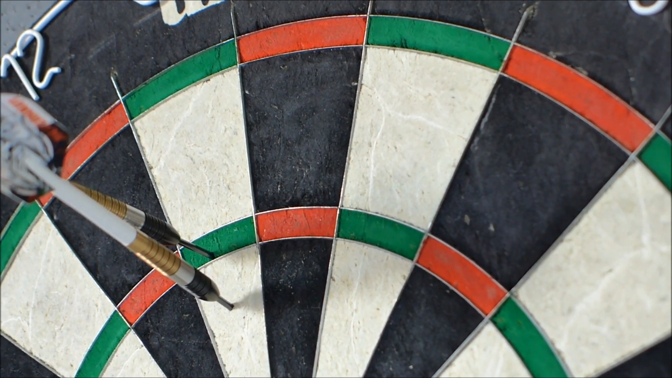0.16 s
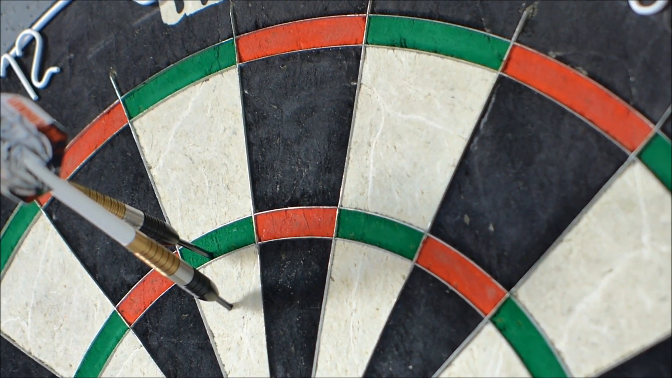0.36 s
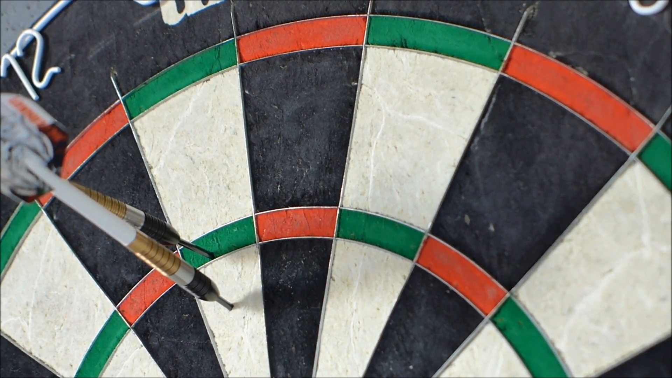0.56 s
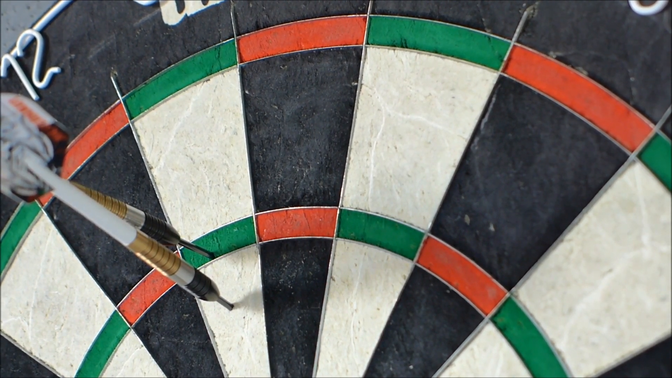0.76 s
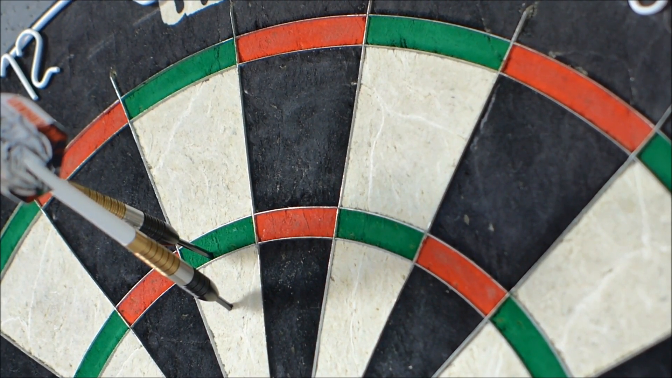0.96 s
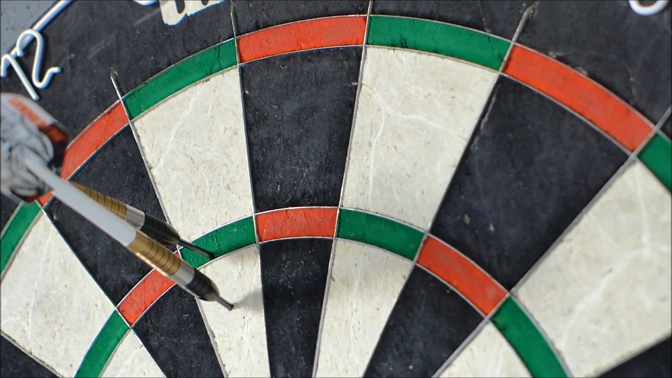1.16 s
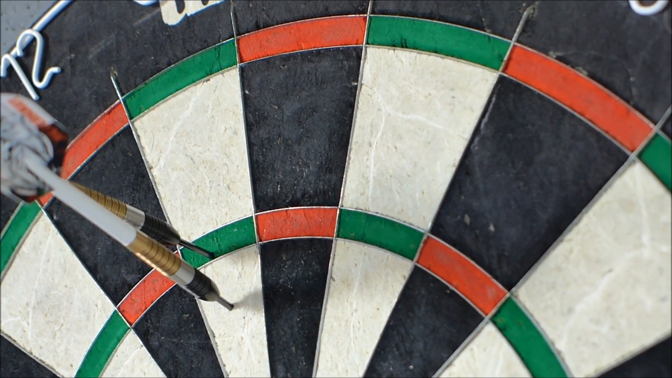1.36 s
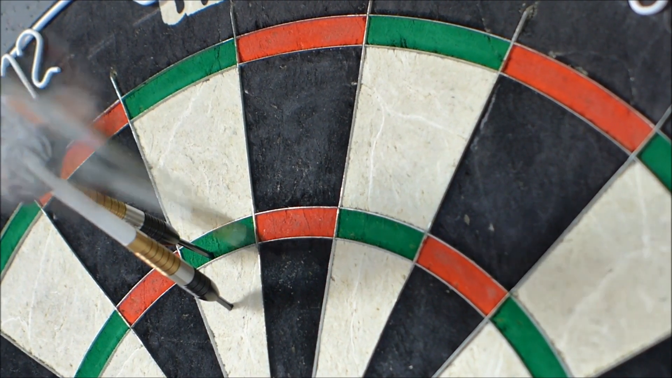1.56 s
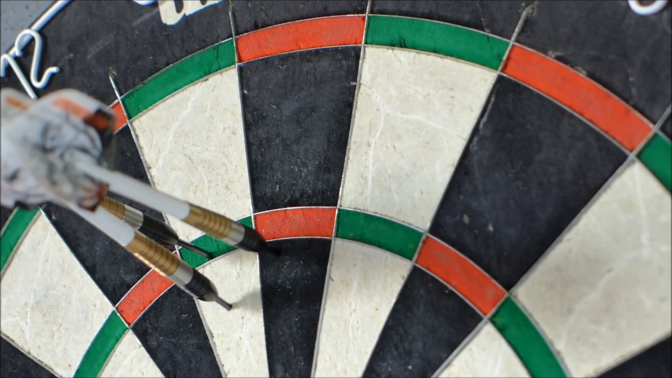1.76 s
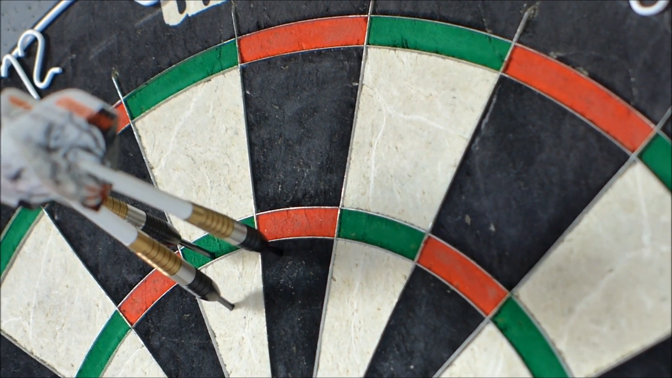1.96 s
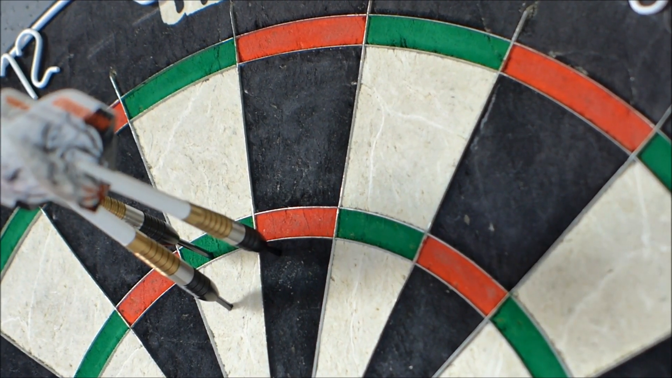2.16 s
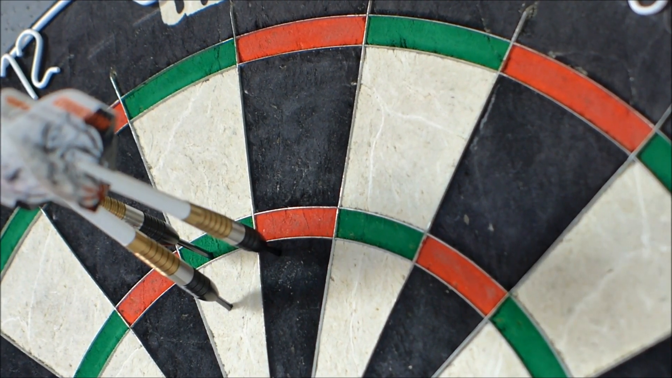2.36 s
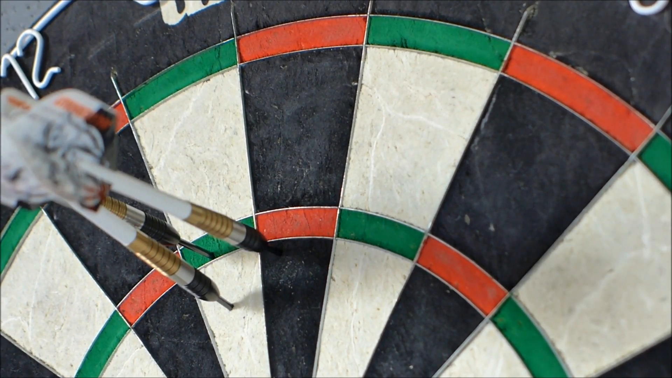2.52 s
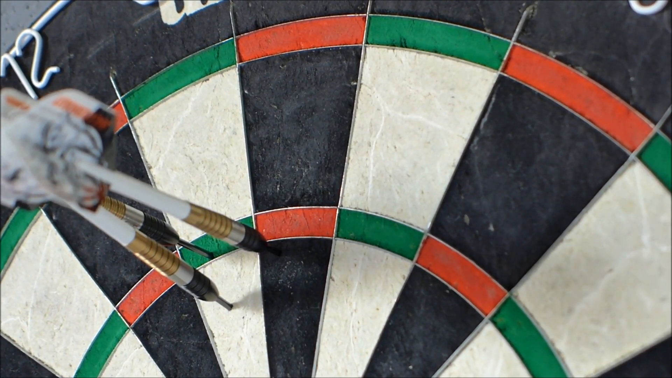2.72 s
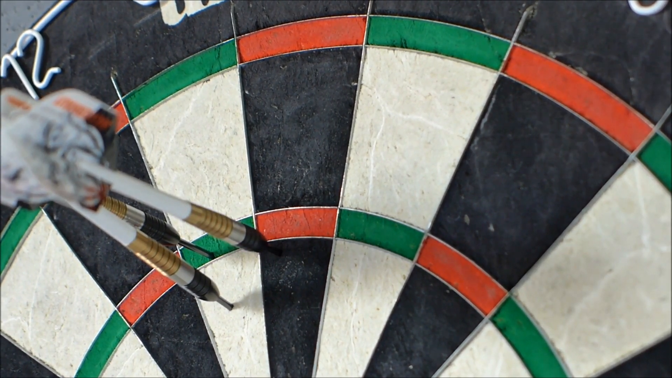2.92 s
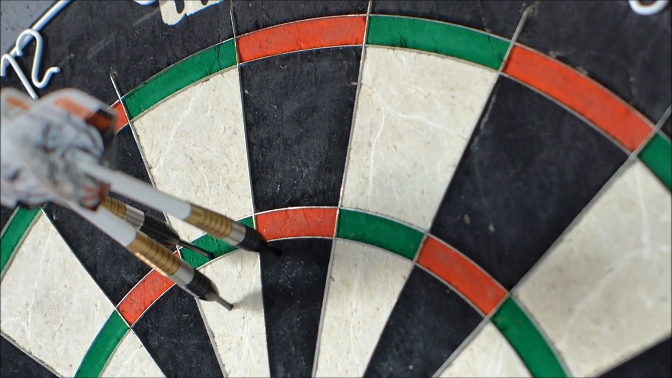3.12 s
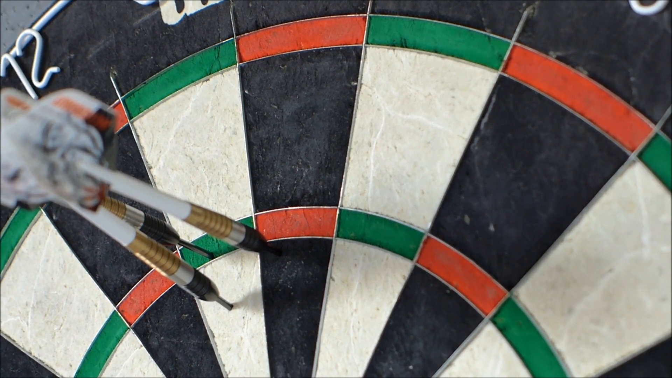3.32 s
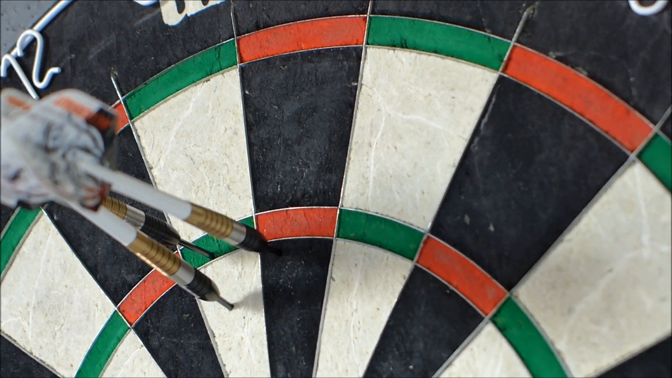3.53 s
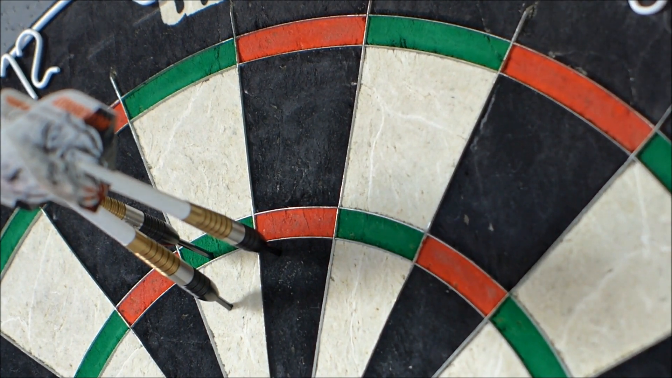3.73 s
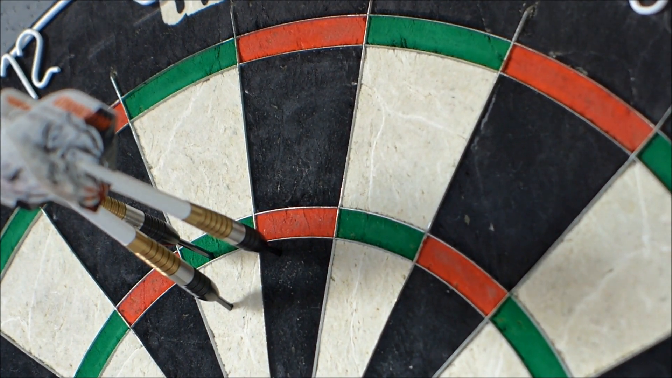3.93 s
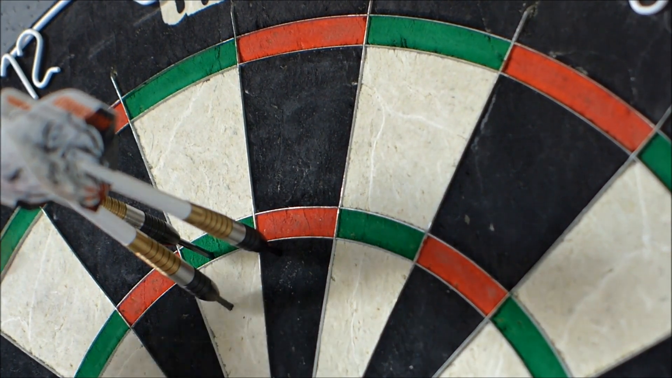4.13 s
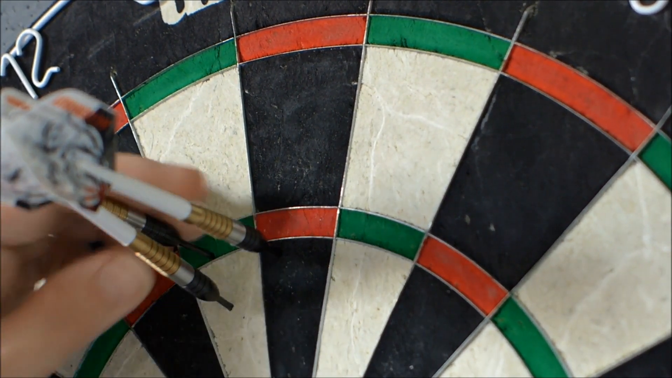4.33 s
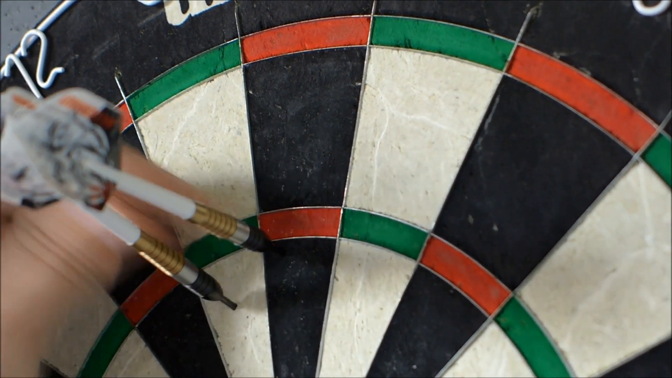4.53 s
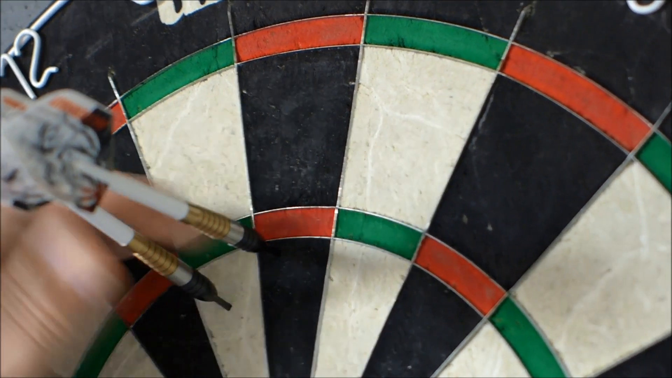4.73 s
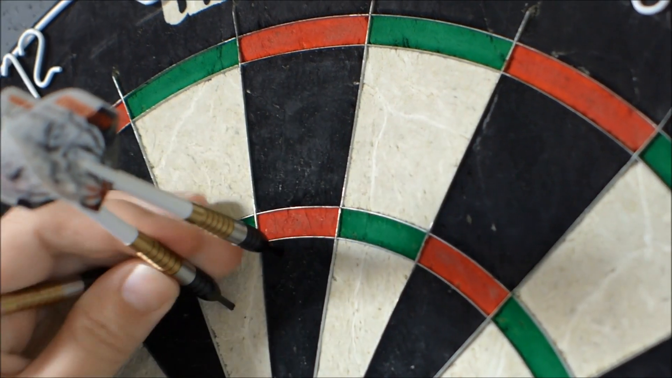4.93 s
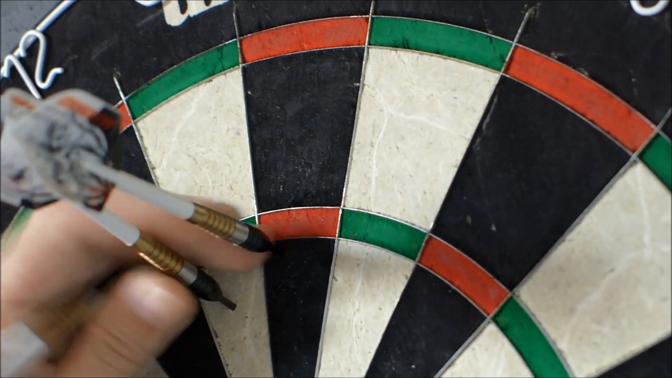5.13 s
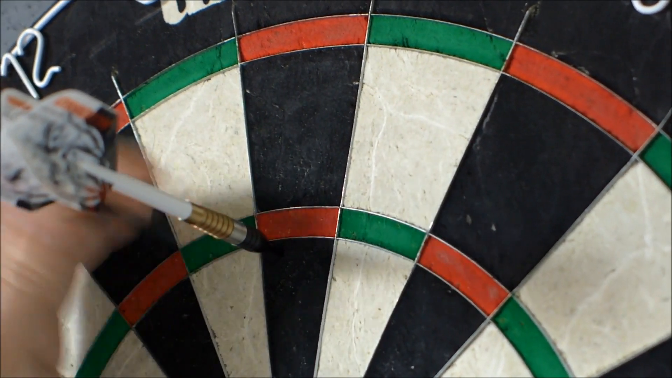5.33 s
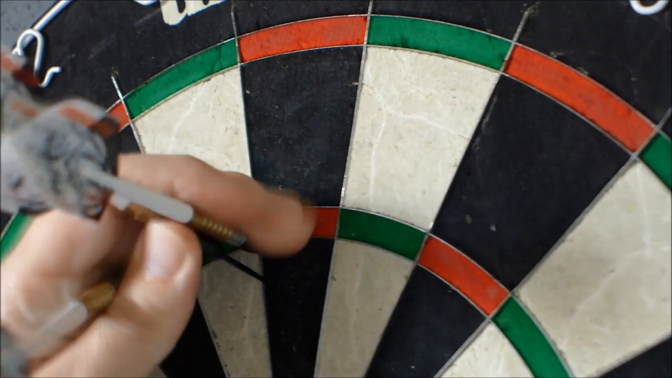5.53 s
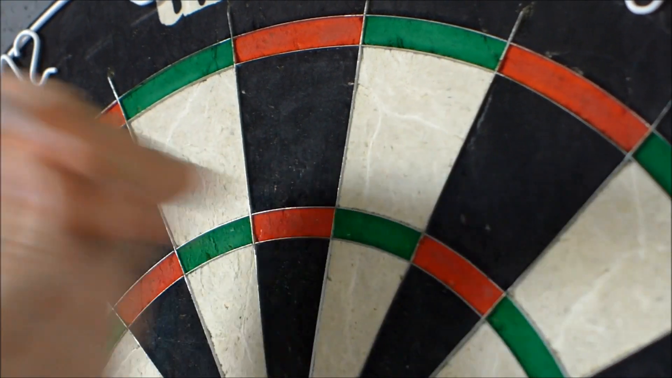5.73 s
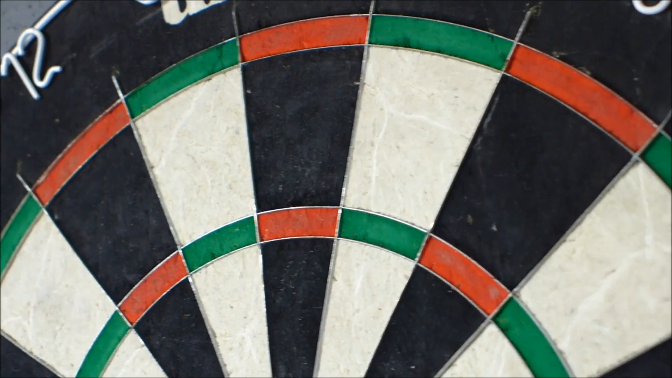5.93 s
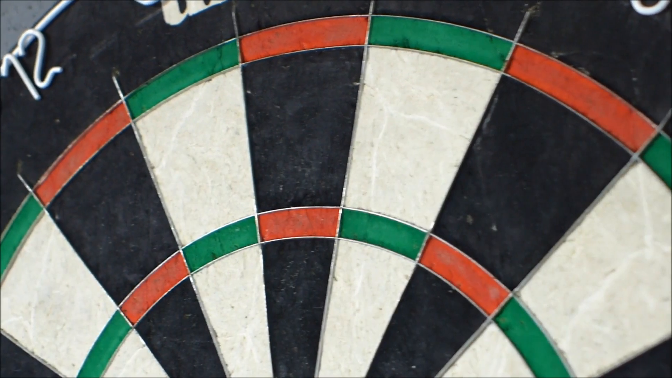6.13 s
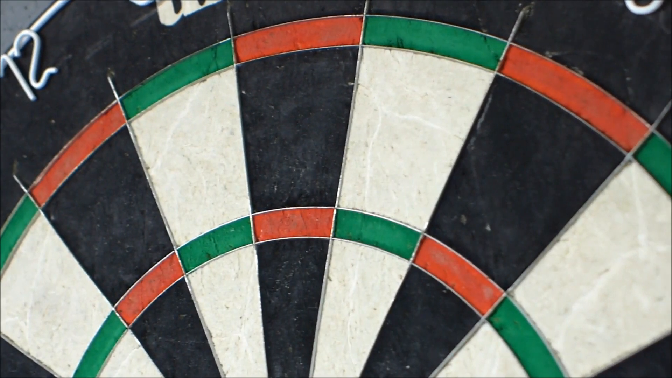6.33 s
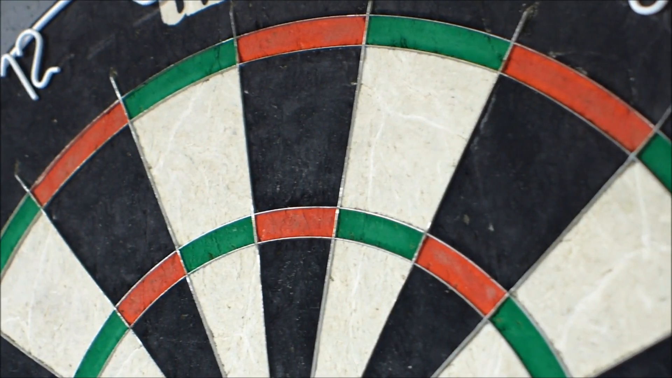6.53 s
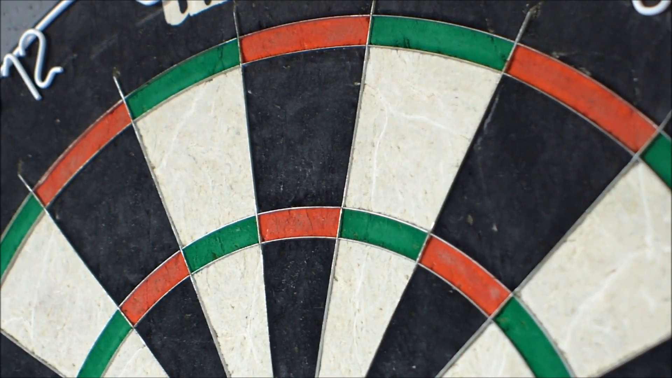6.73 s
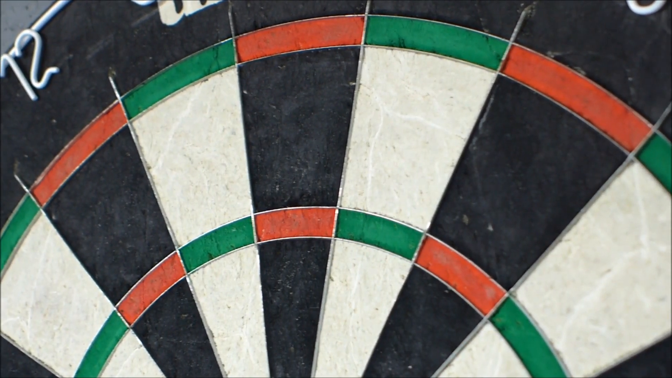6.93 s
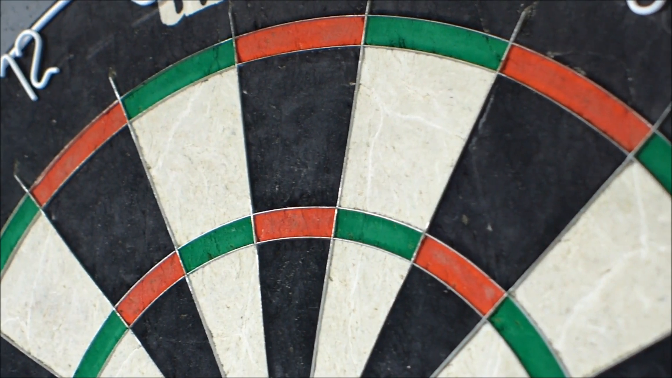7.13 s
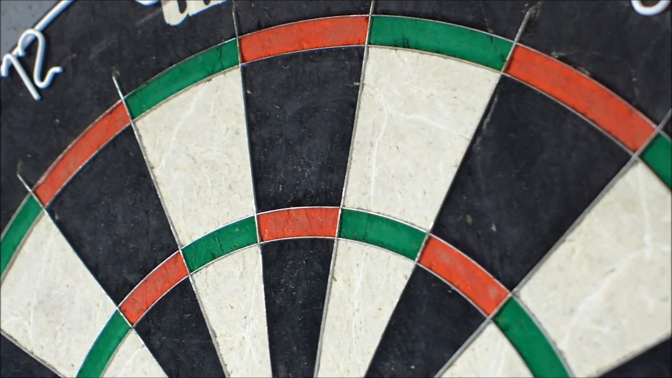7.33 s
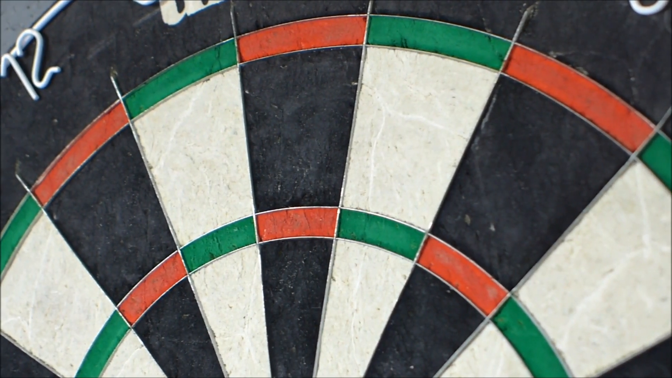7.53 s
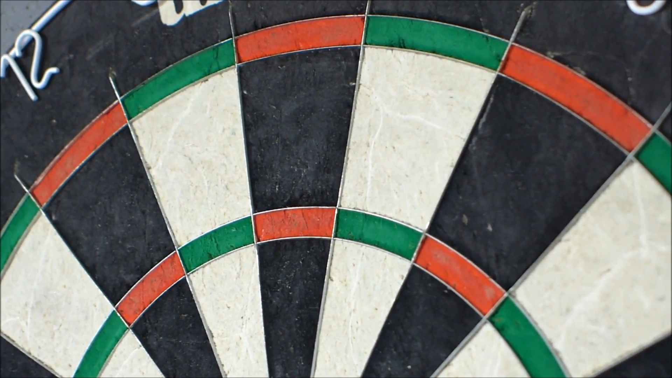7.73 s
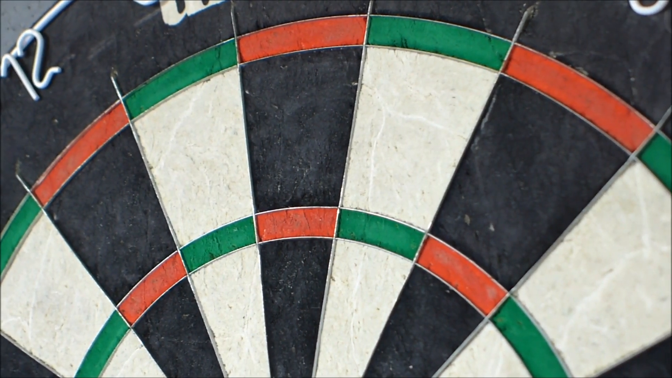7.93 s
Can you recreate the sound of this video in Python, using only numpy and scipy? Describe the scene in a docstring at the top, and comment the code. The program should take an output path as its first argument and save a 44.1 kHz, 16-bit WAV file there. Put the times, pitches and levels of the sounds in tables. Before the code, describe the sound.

Quiet room tone with faint hiss, then a sudden hard dart impact, by far the loudest event, clicking metal and thumping the board on its mount. A few muted steps on wood follow, then a pause. Small ticks and gritty tugs lead to a quick bright scrape of metal barrels as the darts come free. Brushing cloth and irregular wooden footfalls finish it, heard close with short room reflections.

```python
"""Darts on a bristle board

A steel-tipped dart strikes close by: a point ring, clicks against the dart beside it, the board's thud.
The player walks up over a wooden floor, works both darts loose, lets them clink in the hand and walks off.
Impacts are damped modes and dying noise; friction is jerky or swelling noise; a small room answers.
Under it all lie a low room murmur, a faint rumble and a soft hiss, all of filtered stereo noise."""
import sys
import numpy as np
from scipy import signal
from scipy.fft import rfft, irfft, next_fast_len
from scipy.io import wavfile

SR = 44100
rng = np.random.default_rng(int(sys.argv[2]) if len(sys.argv) > 2 else 0)


def output_pcm(signal):
    """Save a mono or channel-first signal as 16-bit PCM at the path in sys.argv[1].

    Samples are clipped to [-1, 1] before scaling.
    """
    pcm = np.clip(np.atleast_2d(signal).T, -1, 1) * 32767
    wavfile.write(sys.argv[1], SR, np.round(pcm).astype(np.int16))


N = 351477
T = np.arange(SR // 2) / SR  # time within one event, s
TOP_HZ = 16000

# Reverberation time of the room: [f/Hz, t60/s]
ROOM_DECAY = [(100, 0.42), (500, 0.25), (1500, 0.23), (5000, 0.17), (14000, 0.14)]
# Stereo width of reflected sound and of steady noise: [f/Hz, side minus mid level/dB]
REFLECTED_WIDTH = [(100, -21), (350, -16.5), (650, -14), (1100, -4.5), (3000, -5.5), (6000, -5),
                   (14000, -3.5)]
# Stereo width of the room murmur: [f/Hz, side minus mid level/dB]
MURMUR_WIDTH = [(60, -17.5), (110, -7.5), (200, -8), (380, 1), (700, 9), (1290, 11), (2380, 4.5), (4400, 5),
                (8120, 0), (15000, -5.5)]

# Spectrum of the still room: [f/Hz, level/dB]
MURMUR_SPECTRUM = [(12, -35), (20, -13), (32, -38), (123, -20), (146, -24), (168, -13.5), (241, -15.5),
                   (357, -21.5), (558, -24), (660, -27), (1120, -28), (3840, -38.5), (5680, -38),
                   (13500, -40.5), (16000, -50)]
# Spectrum of the faint rumble: [f/Hz, level/dB]
RUMBLE_SPECTRUM = [(22, 4), (45, 7), (70, -7.5), (120, -34), (300, -69)]
# Spectrum of the soft hiss: [f/Hz, level/dB]
HISS_SPECTRUM = [(100, -9), (400, 9.5), (1200, 2.5), (3300, -5), (5200, 3), (7000, -0.5), (10000, -1),
                 (13000, -5.5), (15500, -14)]
# Course of the hiss: [t/s, level/dB]
HISS_LEVEL = [(0, -68), (2.2, -63.5), (2.5, -61), (3.6, -59.5), (4.4, -62), (6.1, -61), (7.97, -60)]

# Sleeve and fingers brushing: [t/s of the peak, level/dB, width/s]
SWISHES = [(1.222, -14.5, 0.032), (2.701, -19.5, 0.018), (4.64, -19, 0.011), (5.388, -14.5, 0.057),
           (5.932, -7.5, 0.031), (6.399, -11.5, 0.032), (6.558, -12.5, 0.011), (7.161, -16, 0.037)]
# Spectrum of brushing: [f/Hz, level/dB]
SWISH_SPECTRUM = [(500, -9), (3500, -13), (5000, 2.5), (6300, -7), (9500, -9), (15500, -32)]

# Light knocks, mostly the hand against the board:
# [t/s, level/dB before KNOCK_DB, weight level/dB, body t60/s, wood pitch f/Hz]
BUMPS = [(1.278, -45, -31, .076, 840), (1.982, -45, -23, 0.042, 574), (4.8834, -38, -0.5, 0.042, 370),
         (5.2258, -37, -21, 0.027, 744), (5.304, -43.5, -7, .12, 600), (5.383, -40.5, -12, 0.052, 510),
         (5.551, -22.5, -29, 0.17, 874), (5.776, -43.5, -8, 0.018, 805), (5.861, -45, -16, 0.046, 1260)]
BUMP_RISE_S, BUMP_SLAP_DB = .001, -14
KNOCK_DB = 22  # common gain of steps and bumps
# Spectrum of the blow on the wood: [f/Hz, level/dB]
SOLE_SPECTRUM = [(120, -23), (300, -3), (550, 1.5), (900, -2.5), (1500, -14.5), (2500, -35), (6000, -41.5)]
# Spectrum of the surface slap: [f/Hz, level/dB]
SLAP_SPECTRUM = [(600, -29), (1400, 5.5), (2200, 2.5), (3300, -4.5), (4300, -4), (6500, -21), (10000, -29),
                 (15500, -60)]
# Spectrum of the loading by weight: [f/Hz, level/dB]
WEIGHT_SPECTRUM = [(40, -33), (80, -10), (130, -2), (220, 3.5), (350, -8.5), (700, -38)]

# Bending modes of the landing dart: [f/Hz, level/dB, t60/s]
POINT_MODES = [(1910, -7, .02), (2850, -14, 0.017), (3470, -14.5, 0.022), (4530, -2.5, 0.019),
               (6420, -0.5, .014), (6900, 1.5, 0.018), (9100, 1, 0.014)]
LAND_S = 1.6578  # the point meets the board

# Dart against dart, on landing and in the hand: [t/s, level/dB, tilt/(dB per octave)]
CLICKS = [(1.6582, 11, 2.5), (1.6593, 8.5, -3), (1.6697, -2.5, -1), (1.6734, 3, -7.5), (1.6852, -3.5, -8),
          (1.6905, 6.5, 6.5), (1.692, 9, -.5), (1.716, 2.5, -1), (1.755, -7.5, 0), (4.5660, -15.5, -2),
          (4.881, -8.5, 1.5), (4.9618, -14, 2.5), (5.1945, -16.5, -1.5), (5.228, -17.5, -4),
          (5.4562, -16.5, 0), (5.6134, 7, 0), (5.6212, 1.5, -3.5), (5.8014, 1.5, 1.5), (5.9877, -12, 1)]
# Spectrum of a click: [f/Hz, level/dB]
CLICK_SPECTRUM = [(100, -24), (450, -12.5), (1200, -11.5), (1900, -7.5), (3200, -21), (4400, -2.5),
                  (7000, -11.5), (10000, -8), (15500, -23.5)]
# Modes of barrel, shaft and flight: [f/Hz, level/dB, t60/s]
DART_MODES = [(1119, 2, 0.058), (1950, -15, 0.015), (2170, -3.5, .035), (4050, 5.5, 0.083),
              (4440, -16, 0.032), (4820, 11.5, 0.035), (5300, 0.5, 0.058), (6100, 1, 0.091),
              (7400, 1.5, 0.017), (8900, 1, 0.024)]
CLICK_T60_S = 0.016  # chatter time of an untilted click
DULL_LASTS = 0.12  # growth of log chatter time per dB per octave of dullness

# The board knocks and settles on its mount: [t/s, level/dB, softness corner f/Hz]
THUDS = [(1.6705, 2, 1000), (1.6779, 26, 1100), (1.6823, 29, 600), (1.6942, 11, 700), (1.7070, 8, 900),
         (1.7160, 8, 1200)]
# Spectrum of a thud: [f/Hz, level/dB]
THUD_SPECTRUM = [(45, -65), (75, -24), (115, -1.5), (230, -7.5), (450, 0.5), (750, -1.5), (1300, -14),
                 (2200, -18), (4000, -45)]
# Modes of board and mount: [f/Hz, level/dB, t60/s]
BOARD_MODES = [(124, -4, 0.12), (208, -3.5, 0.24), (327, 10.5, 0.12), (409, -5, 0.14), (476, 3, 0.24),
               (520, -16, 0.2), (566, 4, 0.196), (600, -3, 0.15), (630, -2, 0.25), (758, 1.5, 0.16),
               (930, -2.5, 0.19), (1280, -13, 0.29)]

# Footfalls on the wooden floor, heels and toes, some contacts soft and some loud:
# [t/s, level/dB before KNOCK_DB, weight level/dB, slap level/dB, wood pitch f/Hz]
STEPS = [(2.483, -24.5, -8, -11.5, 645), (2.656, -38, -4, -28, 646), (3.233, -40.5, -5.5, -30, 656),
         (3.329, -31, -13.5, -18, 433), (3.9317, -29, -12, -0.5, 374), (4.073, -41.5, -5, -21, 970),
         (6.129, -51.5, 8.5, -29, 794), (6.245, -38, -11, -26, 790), (6.323, -35.5, -8, -18, 514),
         (6.353, -31.5, -14, -10.5, 576), (6.395, -31, -10, -7, 543), (6.694, -45, -0.5, -30, 537),
         (6.840, -42.5, -0.5, -13, 567), (6.919, -20, -13, -16, 570), (6.990, -34, -13, -23, 546),
         (7.138, -37, -3.5, -15.5, 695), (7.261, -46.5, 0.5, -17, 684), (7.7643, -28, -24, -10.5, 740),
         (7.937, -31, -5.5, -20, 600)]
STEP_RISE_S, STEP_T60_S = 0.0011, 0.075  # rise at a slap level of 0 dB; decay of the body
SHARPER_PER_DB = 0.11  # fall of log rise time per dB of slap
ROLL_S, ROLL_DB = .07, -21.5  # the sole rolls flat just after it lands

# A steel point is wrenched in the fibres: [t/s of the peak, level/dB, gripped barrel's pitch f/Hz]
WRENCHES = [(5.0777, -4, 2200), (5.3396, -2, 2270), (5.5550, -6, 6040)]
# The freed barrels slide together: [t/s of the peak, level/dB, rise/s, barrel's pitch f/Hz]
SLIDES = [(5.6263, 14.5, 0.0019, 1970), (5.7167, 6, 0.0016, 1650), (5.7231, 9, 0.00096, 1740),
          (5.7293, 6.5, .003, 2210), (5.781, -7.5, .0006, 5060)]
# Spectrum of scraping steel: [f/Hz, level/dB]
SCRAPE_SPECTRUM = [(90, -26), (210, -7.5), (330, -10.5), (800, -15), (1120, -10), (1400, -15), (2000, -8.5),
                   (2900, -10), (3800, -8.5), (4700, 1), (7500, -5.5), (11000, -10), (15500, -24)]
SETTLE_S, SETTLE_DB = .0114, -10.5  # after each slide the barrels jostle on, more quietly
SWELL_S = .02  # time allowed for a scrape to swell


def amp(db):
    """Level definition: decibels to amplitude ratio."""
    return 10 ** (np.asarray(db) / 20)


def norm(x):
    """Energy normalisation: the squares sum to 1."""
    return x / np.sqrt(np.sum(x ** 2) + 1e-20)


def along(points, hz):
    """Logarithmic frequency scale: interpolate (f, value) points along it."""
    f, value = np.transpose(points)
    return np.interp(np.log(hz + 1), np.log(f), value)


def diffuse(count, spectrum=None, width=REFLECTED_WIDTH):
    """Diffuse field: independent mid and side noise, rms 1, of frequency-dependent width."""
    hz = np.fft.rfftfreq(count, 1 / SR)
    gain = amp(along(spectrum, hz)) if spectrum else 1
    balance = amp([0 * hz, along(width, hz)])
    noise = rfft(rng.standard_normal((2, count)))
    mid, side = irfft(noise * gain * balance, count)
    pair = np.array([mid + side, mid - side])
    return pair / pair.std()


def colour(x, points, shade=lambda hz: 0):
    """Minimum phase: folding the cepstrum makes a causal filter from points plus a shading in dB."""
    m = 2 * len(T)
    hz = np.fft.rfftfreq(m, 1 / SR)
    gain = amp(along(points, hz) + shade(hz))
    cepstrum = irfft(np.log(gain + 1e-6))
    cepstrum[1:m // 2] *= 2
    cepstrum[m // 2 + 1:] = 0
    response = np.exp(rfft(cepstrum))
    return irfft(rfft(x, m) * response)[:len(T)]


def tilted(tilt):
    """Contact stiffness: hard contacts lift the treble, in dB per octave about 5 kHz, flat below 1 kHz."""
    return lambda hz: tilt * np.log2(np.maximum(hz, 1000) / 5000)


def hump(centre_hz, width_hz, db):
    """Resonance: a peak in dB that halves at width_hz from its centre."""
    return lambda hz: db / (1 + ((hz - centre_hz) / width_hz) ** 2)


def decay(t60):
    """Exponential damping: a fall of 60 dB in t60 seconds."""
    return 1000 ** (-T / t60)


def burst(t60):
    """Damped random excitation: dying noise of energy 1."""
    return norm(rng.standard_normal(len(T)) * decay(t60))


def chatter(depth):
    """Intermittent contact: a force that jumps about every millisecond."""
    knots = T[::40]
    return np.exp(depth * np.interp(T, knots, rng.standard_normal(len(knots))))


def ring(modes, spread=0):
    """Modal superposition: damped sines of total energy 1; spread gives each blow new strengths."""
    total = np.zeros(len(T))
    for hz, db, t60 in modes:
        strength = amp(db) * np.exp(spread * rng.normal())
        total += strength * decay(t60) * np.sin(2 * np.pi * hz * T)
    return norm(total)


def add(track, s, sound, room_db, near_db=-14, pan_db=0):
    """Direct, early and reverberant sound: place an event with nearby scatter and a room tail."""
    hz, t, z = signal.stft(diffuse(len(T)), SR, nperseg=256)
    damped = z * 1000 ** (-t / along(ROOM_DECAY, hz)[:, None])
    tail = signal.istft(damped, SR, nperseg=256)[1][:, :len(T)]
    tail = norm(tail * (1 - np.exp(-T / 0.0037)))  # builds as the walls answer
    left, right = diffuse(len(T)) * np.exp(-T / 0.0019)
    near = norm(np.array([left - right, right - left]))  # opposite in the two channels
    echoes = np.sqrt(2) * (amp(room_db) * tail + amp(near_db) * near)
    wet = signal.fftconvolve(sound[None], echoes, axes=1)[:, :len(T)]
    pan = amp([[pan_db / 2], [-pan_db / 2]])  # left over right: negative leans right
    start = round(s * SR)
    track[:, start:start + len(T)] += (pan * (sound + wet))[:, :max(N - start, 0)]


def background():
    """Stationary noise: a steady murmur and faint rumble, with a hiss of slowly varying level."""
    hiss_db = np.interp(np.arange(N) / SR, *np.transpose(HISS_LEVEL))
    murmur = amp(-57) * diffuse(N, MURMUR_SPECTRUM, MURMUR_WIDTH)
    rumble = amp(-80.5) * diffuse(N, RUMBLE_SPECTRUM)
    hiss = amp(hiss_db) * diffuse(N, HISS_SPECTRUM)
    return murmur + rumble + hiss


def swishes():
    """Soft friction: cloth and skin brush past as noise in a bell-shaped swell."""
    out = np.zeros((2, N))
    lead = .15  # s from the start of an event to its peak
    for s, db, width in SWISHES:
        swell = np.exp(-.5 * ((T - lead) / width) ** 2)
        rub = norm(rng.standard_normal(len(T)) * swell)
        add(out, s - lead, amp(db) * colour(rub, SWISH_SPECTRUM), room_db=-3.5)
    return out


def knock(weight_db, slap_db, rise, t60, wood_hz):
    """Impact on wood: a blow excites two bending modes, slaps the surface and loads it with weight."""
    press = 1 - np.exp(-T / rise)
    load = 1 - np.exp(-T / 0.0044)
    low_mode, high_mode = hump(wood_hz, 90, 6), hump(1.75 * wood_hz, 140, 4)
    body = norm(colour(burst(t60) * press, SOLE_SPECTRUM, lambda hz: low_mode(hz) + high_mode(hz)))
    slap = norm(colour(burst(t60 * 1.64) * press * chatter(depth=0.42), SLAP_SPECTRUM))
    weight = norm(colour(burst(t60 * 1.18) * load, WEIGHT_SPECTRUM))
    return amp(KNOCK_DB) * (body + amp(slap_db) * slap + amp(weight_db) * weight)


def bumps():
    """Brief impact: single quick knocks with little slap."""
    out = np.zeros((2, N))
    for s, db, weight_db, t60, wood_hz in BUMPS:
        bump = knock(weight_db, BUMP_SLAP_DB, BUMP_RISE_S, t60, wood_hz)
        add(out, s, amp(db) * bump, room_db=-5.5, near_db=-10.0)
    return out


def point():
    """Damped bending modes: the whole dart rings for an instant before the fibres damp it."""
    out = np.zeros((2, N))
    add(out, LAND_S, amp(3.5) * ring(POINT_MODES), room_db=-15, near_db=-14)
    return out


def clicks():
    """Contact of solids: a sharp tick and uneven chatter ring the dart; dull contacts chatter longer."""
    out = np.zeros((2, N))
    for s, db, tilt in CLICKS:
        t60 = CLICK_T60_S * np.exp(-DULL_LASTS * tilt)
        tick = 0.23 * (T == 0)
        contact = norm(tick + norm(burst(t60) * chatter(depth=0.42)))
        rung = ring(DART_MODES, spread=.3)
        sound = colour(contact + amp(-17.5) * rung, CLICK_SPECTRUM, tilted(tilt))
        add(out, s, amp(db) * sound, room_db=-5, near_db=-11, pan_db=-1.0)
    return out


def board():
    """Impulse response: heavy pushes and small rebounds on the mount, with a short woody modal ring."""
    out = np.zeros((2, N))
    for s, db, soft_hz in THUDS:
        # a soft contact passes little above its corner
        push = colour(1. * (T == 0), THUD_SPECTRUM, lambda hz: -10 * np.log10(1 + (hz / soft_hz) ** 4))
        add(out, s, -amp(db) * push, room_db=-17.0, near_db=-18.0, pan_db=-0.1)
    heaviest = max(THUDS, key=lambda row: row[1])[0]
    woody = ring(BOARD_MODES) * (1 - np.exp(-T / .003))
    add(out, heaviest, amp(7.5) * woody, room_db=-29, near_db=-14.5)
    return out


def steps():
    """Impact duration: each contact lands and rolls flat; the weaker its slap, the slower it presses in."""
    out = np.zeros((2, N))
    for s, db, weight_db, slap_db, wood_hz in STEPS:
        rise = STEP_RISE_S * np.exp(-SHARPER_PER_DB * slap_db)
        for delay, loss_db in [(0, 0), (ROLL_S, ROLL_DB)]:
            footfall = knock(weight_db, slap_db, rise, STEP_T60_S, wood_hz)
            add(out, s + delay, amp(db + loss_db) * footfall, room_db=-4.5, near_db=-10.5)
    return out


def scrape(rise, t60, tilt, barrel_hz, barrel_db):
    """Stick-slip friction: tiny jerks swell and die away, ringing a barrel whose pitch the grip sets."""
    t = T - SWELL_S
    grip = np.where(t < 0, np.exp(-abs(t) / rise), 1000 ** (-abs(t) / t60))
    slips = norm(grip * rng.standard_normal(len(T)) * chatter(depth=0.23))
    rung = signal.fftconvolve(slips, ring(DART_MODES, spread=0.26))[:len(T)]
    barrel = hump(barrel_hz, 0.087 * barrel_hz, barrel_db)
    return colour(slips + amp(-17.5) * rung, SCRAPE_SPECTRUM, lambda hz: tilted(tilt)(hz) + barrel(hz))


def scrapes():
    """Dull and bright friction: points wrench loose on the right; free barrels slide, then settle."""
    out = np.zeros((2, N))
    for s, db, hz in WRENCHES:
        pull = scrape(rise=.0016, t60=0.023, tilt=-5.0, barrel_hz=hz, barrel_db=11.5)
        add(out, s - SWELL_S, amp(db) * pull, room_db=-5.0, near_db=-8, pan_db=-3.0)
    for s, db, rise, hz in SLIDES:
        start = s - SWELL_S
        slide = scrape(rise, t60=0.023, tilt=-0.22, barrel_hz=hz, barrel_db=13.5)
        add(out, start, amp(db) * slide, room_db=-7.5, near_db=-9.5, pan_db=.2)
        settle = scrape(rise=.004, t60=0.1, tilt=-1.5, barrel_hz=hz, barrel_db=1)
        add(out, start + SETTLE_S, amp(db + SETTLE_DB) * settle, room_db=-4.0, near_db=-9, pan_db=-2.0)
    return out


def scene():
    """Linear superposition: darts, board and player sum in the room."""
    return background() + swishes() + bumps() + point() + clicks() + board() + steps() + scrapes()


def record(dry):
    """Band limitation: nothing from TOP_HZ upward passes, and a small steady offset is added."""
    m = next_fast_len(N + SR // 2)
    passed = np.fft.rfftfreq(m, 1 / SR) < TOP_HZ
    return irfft(rfft(dry, m) * passed, m)[:, :N] - .003


dry = scene()
out = record(dry)
output_pcm(out)
```